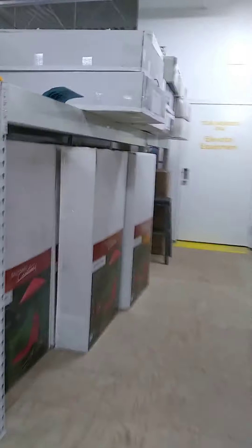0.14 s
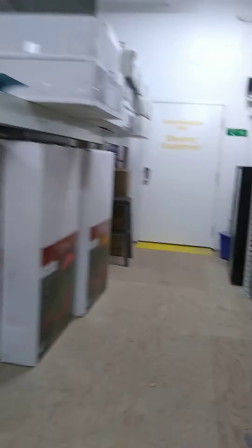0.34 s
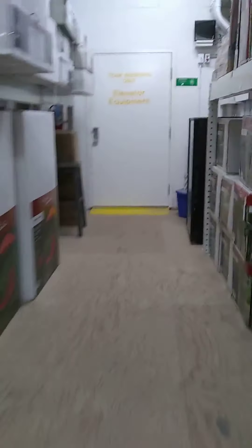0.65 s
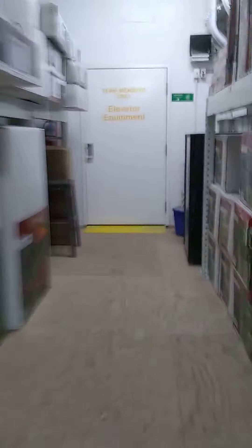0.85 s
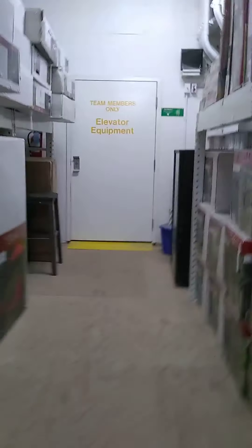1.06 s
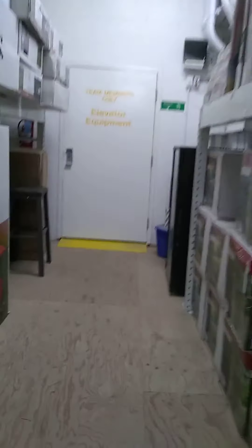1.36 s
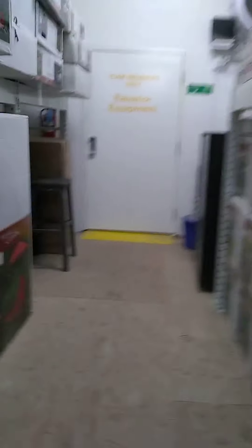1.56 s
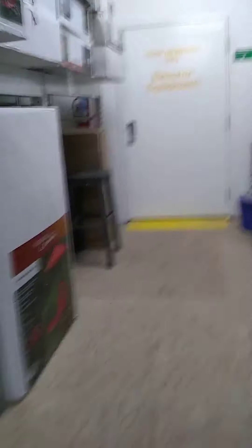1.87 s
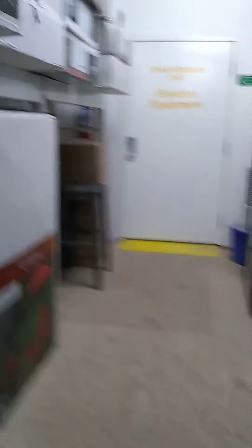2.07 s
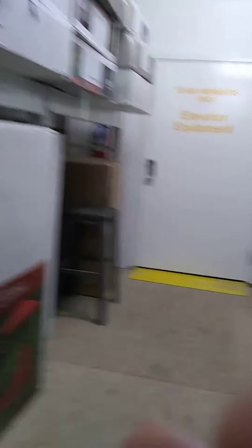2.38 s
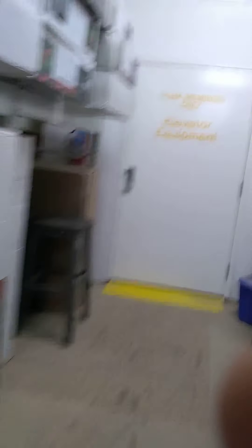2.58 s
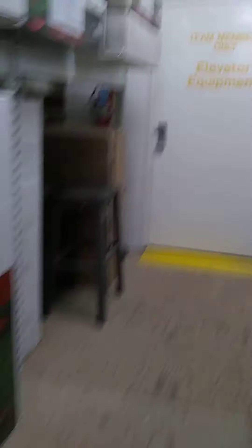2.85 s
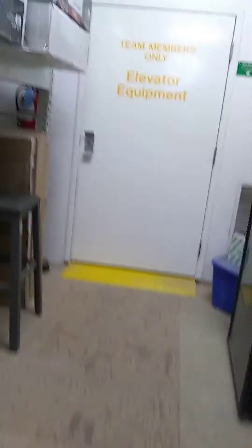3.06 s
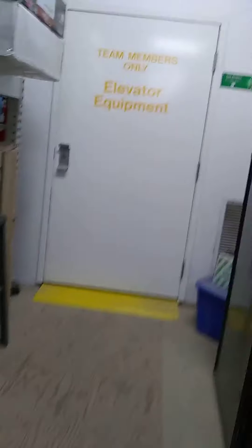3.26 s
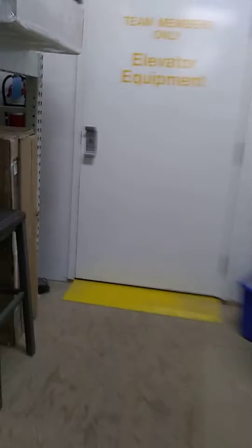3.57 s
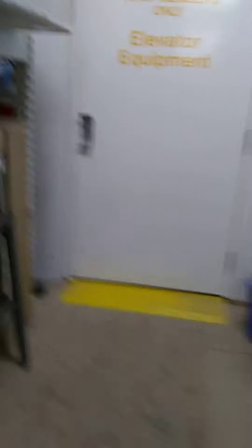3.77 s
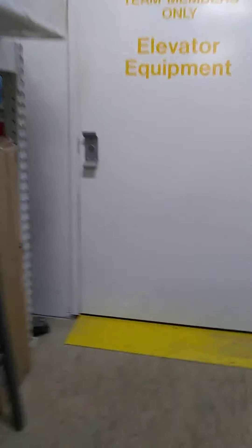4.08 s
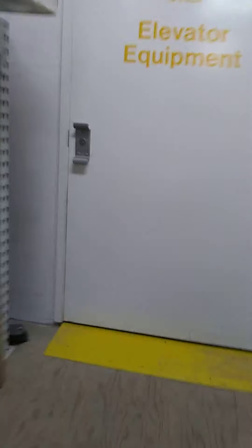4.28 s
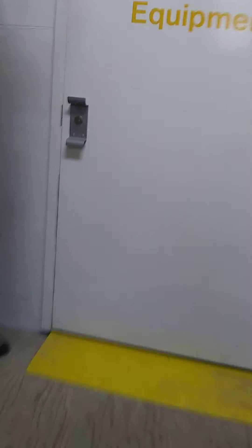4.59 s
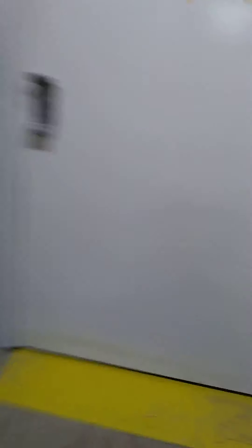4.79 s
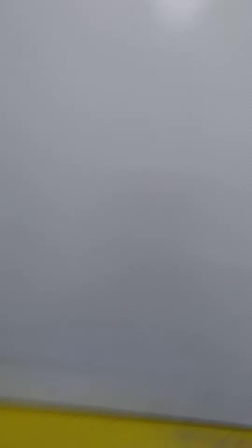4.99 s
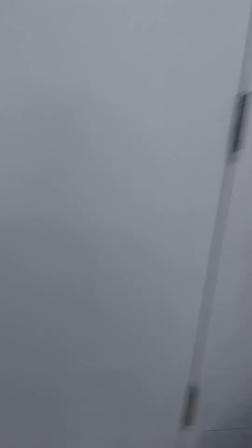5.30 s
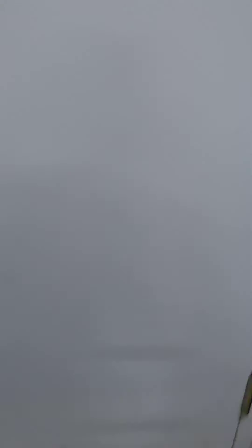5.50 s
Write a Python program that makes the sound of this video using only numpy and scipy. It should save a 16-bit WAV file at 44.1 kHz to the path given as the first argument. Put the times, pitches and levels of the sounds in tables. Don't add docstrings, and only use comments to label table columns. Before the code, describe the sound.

A wheeled cart grinds roughly over a gritty hard floor in a narrow stockroom, rattling with repeated hard clacks, boomy thuds and small metallic ticks.

```python
import sys
import numpy as np
from scipy import signal
from scipy.fft import rfft, irfft, next_fast_len
from scipy.io import wavfile

SR = 44100
rng = np.random.default_rng(int(sys.argv[2]) if len(sys.argv) > 2 else 0)


def dump(signal):
    limited = np.clip(np.atleast_2d(signal).T, -1, 1)
    pcm = np.round(limited * 32767).astype(np.int16)
    wavfile.write(sys.argv[1], SR, pcm)


def elevation(decibels):
    levels = np.asarray(decibels, float)
    return 10 ** (levels / 20)


N = 248591
SIZE = next_fast_len(N + SR // 2)
HZ = np.maximum(np.arange(SIZE // 2 + 1) * SR / SIZE, 1)
PATHS = 4


def rms_one(x):
    return x / np.sqrt(np.mean(np.abs(x) ** 2) + 1e-20)


def at_hz(points):
    hz, *columns = np.transpose(points)
    return [np.interp(np.log(HZ), np.log(hz), c) for c in columns]


def in_time(rows):
    s, *columns = np.transpose(rows)
    return [np.interp(np.arange(N) / SR, s, c) for c in columns]


def drift(rate_hz):
    knots = rng.standard_normal(N // 40 + 2002)
    pole = np.exp(-80 * np.pi * rate_hz / SR)
    slow = signal.lfilter([1], [1, -2 * pole, pole * pole], knots)[2000:]
    return np.interp(np.arange(N) / 40, np.arange(len(slow)), rms_one(slow))


def rings(modes):
    response = 0
    for k, (hz, width_hz, db) in enumerate(modes):
        detuning = (HZ ** 2 - hz ** 2) / (HZ * max(width_hz, 2))
        response = response + (-1) ** k * elevation(db) / (1 + .64j * detuning) ** 2
    return response


def bursts(times, levels_db, t60, rise_s):
    out, t = np.zeros(N + SR), np.arange(round(SR * t60)) / SR
    first = 1 + 0.41 * np.exp(-t / 0.0012)
    for s, db in zip(times, levels_db):
        i = round(s * SR)
        out[i:i + len(t)] += elevation(db - 60 * t / t60) * first * (1 - np.exp(-t / rise_s))
    return out[:N]


PATH_TURNS = [0, .25, .25, .75]


def struck(times, levels_db, pitches_hz, t60, rise_s):
    out, t = np.zeros((PATHS, N + SR)), np.arange(round(SR * t60)) / SR
    for s, db, hz, turn in zip(times, levels_db, pitches_hz, rng.random((len(times), PATHS))):
        i = round(s * SR)
        swell = elevation(db - 60 * t / t60) * (1 - np.exp(-t / rise_s))
        phase = (turn[0] + turn / 10 + PATH_TURNS)[:, None]
        out[:, i:i + len(t)] += swell * np.sin(2 * np.pi * (hz * t + phase))
    return out[:, :N]


def grit(per_s, spread_db, smooth):
    happens = rng.random(N) < per_s / SR
    sizes = elevation(spread_db * np.minimum(rng.exponential(1, N), 3)) * happens
    return rms_one(rng.standard_normal((PATHS, N)) * (rms_one(sizes) + smooth))


def shaken(steady_db, jolts, contacts, broad, modes, flutter_db, patchy_db):
    force = np.hypot(elevation(steady_db + flutter_db * drift(2.8)), jolts) * contacts
    groups = [rings(modes[k::3]) for k in range(3)]
    size = np.sqrt(np.mean(np.abs(broad + sum(groups)) ** 2))
    total = sum(rfft(force * elevation(patchy_db * drift(8.5)), SIZE) * group for group in groups)
    if np.ndim(broad):
        total = total + rfft(force, SIZE) * broad
    return total / size


# worst_s [s], length_s [s], level_db [dB], brightness_db [dB]
PATCHES = [(0.076, 0.22, -37.5, 1), (0.362, 0.23, -36.5, 1.5), (0.608, 0.29, -36.5, -4),
           (0.728, 0.23, -33, -2), (1.052, 0.22, -36.5, -6), (1.201, 0.059, -30, 8),
           (1.561, 0.15, -31.5, 3.5), (1.83, 0.27, -39.5, -0.5), (2.192, 0.11, -31.5, -1),
           (2.28, 0.42, -36.5, -4), (2.55, 0.058, -42, -9), (2.806, 0.12, -31.5, 7.5),
           (2.906, 0.051, -36.5, -9), (3.118, 0.27, -36.5, 1), (3.337, 0.22, -38, -3),
           (3.419, 0.11, -26, 4), (3.498, 0.38, -36, -0.5), (3.747, 0.2, -40, 2), (4.007, 0.075, -32, -3),
           (4.066, 0.035, -32, 0.5), (4.147, 0.25, -34, 2), (4.328, 0.11, -36.5, 0.5),
           (4.582, 0.081, -33, 1.5), (4.628, 0.028, -24, -16), (4.8, 0.13, -41, 7),
           (4.845, 0.12, -32.5, -6), (5.018, 0.2, -43.5, -47), (5.094, 0.21, -35, 3),
           (5.314, 0.13, -49, -18), (5.36, 0.1, -46.5, 9), (5.436, 0.061, -33.5, -11)]


def patches(brightness_share):
    rise, fall, slope_db = 0.36, 0.52, 12
    t, power = np.arange(0, N + 64, 64) / SR, 1e-12
    for s, length_s, db, bright_db in PATCHES:
        away = np.maximum((s - t) / rise, (t - s) / fall) / max(length_s, .01)
        power = power + elevation(db + brightness_share * bright_db - slope_db * away) ** 2
    return np.interp(np.arange(N) / SR, t, 10 * np.log10(power))


def shake_db(steady_db, over_db, swing, patch_db, bright):
    mean_db = steady_db.mean()
    steady = mean_db + over_db + swing * (steady_db - mean_db)
    return 20 * np.log10(np.hypot(elevation(steady), elevation(patches(bright) + patch_db)))


# start_s [s], wheel_grind_db [dB], deck_bounce_db [dB]
ROLLING = [(0.0, -42, -36.5), (0.5, -46, -66), (0.53, -43, -43.5), (1.25, -37, -38.5), (1.47, -40.5, -45.5),
           (1.55, -39, -39.5), (2.26, -48.5, -37.5), (2.52, -44, -51), (2.92, -36, -37), (3.01, -40, -47),
           (3.07, -40, -37), (3.39, -51.5, -48), (3.42, -44, -52), (3.67, -57, -59), (3.73, -42.5, -43),
           (4.83, -43, -43), (5.44, -41.5, -44), (5.63, -41.5, -47)]


def cart():
    grind_db, bounce_db = in_time(ROLLING)
    road = grit(per_s=1800, spread_db=2.5, smooth=0.93)
    plates = deck(bounce_db) + tray(grind_db, road) + body(grind_db, road)
    return plates + clacks() + rails(grind_db, road) + frame(grind_db) + loose_parts(grind_db)


# start_s [s], body_peak_db [dB], pitch_hz [Hz], rails_over_body_db [dB]
KNOCKS = [(0.333, -35, 955, -5), (0.592, -15, 937, -11.5), (0.715, -15, 970, -14.5),
          (1.014, -20.5, 870, -11), (1.198, -21.5, 1500, -8), (1.552, -35.5, 735, 3.5),
          (1.754, -26.5, 1030, -5), (1.918, -18.5, 1083, -30), (2.187, -38, 646, -1),
          (2.267, -19.5, 935, -14), (2.548, -23.5, 1134, -17), (2.694, -22.5, 948, -13.5),
          (2.784, -17.5, 1200, -12), (3.299, -23.5, 730, -12), (1.175, -18.5, 905, -16),
          (3.424, -16.5, 884, -14), (3.497, -21.5, 710, -11), (3.608, -21, 986, -15),
          (3.999, -36, 1160, -24), (4.054, -22, 670, -25), (4.134, -15.5, 1075, -17),
          (4.232, -20, 970, -21), (4.296, -19, 1056, -25), (4.558, -19.5, 810, -18),
          (4.618, -10, 1014, -15), (4.634, -23.5, 1070, -1.5), (4.647, -14, 645, -32),
          (4.988, -23, 696, -11.5), (5.101, -34.5, 716, 9), (5.43, -18.5, 1075, -24)]
# start_s [s], body_peak_db [dB], pitch_hz [Hz], rails_over_body_db [dB]
BOUNCES = [(0.069, -28, 1004, -9), (0.552, -22.5, 950, -20), (0.851, -31, 1010, -12),
           (0.921, -43, 900, -24), (1.023, -28, 855, -18), (1.067, -24.5, 860, -11), (1.128, -25, 950, -21),
           (1.206, -20.5, 695, -15), (1.535, -29, 780, -19), (1.827, -26.5, 1010, -5.5),
           (2.277, -27, 700, -12), (2.804, -19, 1480, -12), (2.82, -16.5, 746, -25), (2.845, -19, 835, -27),
           (2.9, -23.5, 990, -10), (3.112, -24, 715, -15), (3.221, -26.5, 1250, -26),
           (3.311, -22, 1370, -19), (3.335, -22, 1335, -22), (3.434, -15.5, 886, -15),
           (3.451, -16, 684, -16), (3.479, -17.5, 935, -20), (3.789, -22.5, 895, -22),
           (3.807, -29, 1030, -33), (4.067, -18, 1220, -20), (4.147, -19, 1120, -14),
           (4.178, -21, 1074, -24), (4.316, -23, 950, -19), (4.571, -16, 936, -24), (4.813, -50, 780, -16),
           (4.85, -29, 1010, -4), (5.381, -34, 1010, -25)]


def wheel_impacts():
    start_s, body_db, pitch_hz, over_db = np.transpose(KNOCKS + BOUNCES)
    return start_s, body_db, pitch_hz, body_db + over_db


# start_s [s], level_db [dB], pitch_hz [Hz], tray_db [dB]
THUDS = [(0.283, -39, 140, -33), (0.516, -26, 131, -51), (0.594, -29, 147.5, -49),
         (0.684, -20.5, 133.6, -40), (0.894, -23.5, 133, -36), (0.993, -24, 135, -33),
         (1.208, -20, 125.4, -52), (1.57, -18.5, 133.6, -46), (1.696, -49, 143, -55),
         (1.751, -22.5, 140, -45), (1.815, -20, 138, -46), (1.864, -50, 138, -55), (1.921, -25, 162, -38),
         (2.037, -21.5, 150, -55), (2.086, -62, 140, -67), (2.185, -19, 140, -47), (2.282, -37, 135, -41),
         (2.666, -33, 148, -54), (0.744, -25, 138, -45), (3.07, -26, 140, -54), (3.159, -23.5, 140, -33),
         (3.47, -26, 108, -50), (3.748, -29, 130, -51), (3.273, -20.5, 134.5, -42), (3.399, -23, 136, -50),
         (3.42, -18, 123, -50), (3.96, -25, 118, -35), (4.197, -25, 130, -34.5), (4.42, -24.5, 119, -35.5),
         (4.643, -21, 124.6, -27.5), (4.804, -35, 143, -49), (4.844, -24.5, 152, -29.5),
         (5.126, -47, 138, -31.5), (5.532, -37, 150.6, -30.5)]
# start_s [s], level_db [dB], pitch_hz [Hz]
TRAY_HITS = [
    (4.642, -14, 310),
    (5.441, -26, 330),
    (5.452, -25, 296),
    (1.012, -28, 450),
    (1.3, -31, 297),
    (3.519, -26.5, 305),
    (3.621, -30, 306),
    (4.40, -30, 380),
    (5.37, -30, 400),
]
# start_s [s], level_db [dB], pitch_hz [Hz]
CLANGS = [(0.301, -38, 3250), (0.591, -31, 3174), (0.711, -41, 2940), (1.198, -46, 3230),
          (2.784, -54, 2920), (2.805, -52, 3100), (2.846, -53, 3500), (2.895, -55, 2970),
          (4.148, -38, 2880), (4.296, -41.5, 3120), (4.317, -49, 3200), (3.498, -37, 3530),
          (4.055, -38, 2940), (4.134, -34, 2850), (4.232, -39, 3240), (4.568, -38, 3570),
          (4.645, -35, 3290), (0.6, -40, 3160), (4.619, -22, 3000), (4.635, -39, 3400),
          (5.101, -31.5, 3340), (5.431, -46, 2920)]
# pitch_ratio [multiple of its loudest ring], level_db [dB]
BODY_CLUSTER = [(0.64, -16.5), (1.0, -1.5), (1.47, -14.5)]


def clacks():
    at, body_db, body_hz, rails_db = wheel_impacts()
    knocked = sum(struck(at, body_db - 10 + db, ratio * body_hz, t60=0.059, rise_s=0.00029)
                  for ratio, db in BODY_CLUSTER)
    seams = slice(len(KNOCKS))
    rail_hz = np.full(len(KNOCKS), 1972)
    rail_tone = struck(at[seams], rails_db[seams] - 10, rail_hz, t60=0.3, rise_s=0.0033)
    drop, deck_db, deck_hz, _ = np.transpose(THUDS)
    boom = struck(drop, deck_db + 4, deck_hz, t60=0.11, rise_s=0.013)
    clang, frame_db, frame_hz = np.transpose(CLANGS)
    clanging = struck(clang, frame_db + 1.7, frame_hz, t60=0.04, rise_s=0.0016)
    tray_ring = struck(*np.transpose(TRAY_HITS), t60=0.094, rise_s=0.00055)
    return rfft(knocked + rail_tone + boom + clanging + tray_ring, SIZE)


# pitch_hz [Hz], width_hz [Hz], level_db [dB]
DECK_RINGS = [(122, 73, -33), (133.6, 28, 2), (160, 63, 2)]


def deck(bounce_db):
    bumps = grit(per_s=370, spread_db=-1.0, smooth=0.38)
    level_db = shake_db(bounce_db, over_db=-2.5, swing=1, patch_db=-7, bright=0)
    return shaken(level_db, 0, bumps, 0, DECK_RINGS, flutter_db=2.0, patchy_db=1.8)


# pitch_hz [Hz], width_hz [Hz], level_db [dB]
TRAY_RINGS = [(207.7, 30, -13), (253, 63, -4), (287, 16, -10), (361.8, 68.6, -1), (400.5, 33, -4.5)]


def tray(grind_db, road):
    drop, _, _, tray_db = np.transpose(THUDS)
    jolts = bursts(drop, tray_db + .1, t60=0.18, rise_s=0.0015)
    level_db = shake_db(grind_db, over_db=-0.5, swing=0.5, patch_db=-2, bright=-0.26)
    return shaken(level_db, jolts, road, 0, TRAY_RINGS, flutter_db=0.84, patchy_db=2.5)


# pitch_hz [Hz], level_db [dB per Hz]
BODY_BROAD = [(250, -21), (400, 1), (520, 4), (700, 3), (1000, -6.5), (1250, -12), (1600, -15), (3000, -80)]
# pitch_hz [Hz], width_hz [Hz], level_db [dB]
BODY_RINGS = [(583, 22, 1), (688, 19, -26), (817, 61, -7), (970.4, 50, 1.5), (1100.5, 55, 1), (1180, 50, 0)]


def body(grind_db, road):
    at, body_db, _, _ = wheel_impacts()
    jolts = bursts(at, body_db - 7.5, t60=0.022, rise_s=0.0014)
    level_db = shake_db(grind_db, over_db=-4, swing=1.1, patch_db=-3.5, bright=-0.2)
    return shaken(level_db, jolts, road, elevation(at_hz(BODY_BROAD)[0]), BODY_RINGS, flutter_db=0.5, patchy_db=2.5)


# pitch_hz [Hz], level_db [dB per Hz]
RAILS_BROAD = [(600, -51), (1100, 3), (1300, 5), (1950, 13), (2150, -25), (2300, -35), (3000, -6),
               (5000, -67)]
# pitch_hz [Hz], width_hz [Hz], level_db [dB]
RAIL_RINGS = [(1500, 71, -2), (1523, 11, 4.5), (1604, 35, -4), (1794, 12, 16), (1819, 32, 15),
              (2010, 12, -22), (2089, 76, 10.5)]


def rails(grind_db, road):
    at, _, _, rails_db = wheel_impacts()
    jolts = bursts(at, rails_db + 3, t60=0.053, rise_s=0.0054)
    level_db = shake_db(grind_db, over_db=-16.5, swing=1.16, patch_db=-11.5, bright=0)
    return shaken(level_db, jolts, road, elevation(at_hz(RAILS_BROAD)[0]), RAIL_RINGS, flutter_db=0.4, patchy_db=4.5)


# pitch_hz [Hz], level_db [dB per Hz]
FRAME_BROAD = [(1200, -53), (1900, 8), (2400, 4.5), (2900, 8), (3800, 1.5), (4500, 3), (5500, -60),
               (8000, -54)]
# pitch_hz [Hz], width_hz [Hz], level_db [dB]
FRAME_RINGS = [(2810, 30, 1), (3160, 22, -10), (3250, 75, -16), (3394, 37, 4), (3600, 34, -15),
               (3606, 11.4, 4.5), (4970, 60, -7)]


def frame(grind_db):
    at, _, _, rails_db = wheel_impacts()
    jolts = np.hypot(bursts(at, rails_db - 11, t60=0.082, rise_s=0.0006),
                     bursts(*np.transpose(CLANGS)[:2], t60=0.053, rise_s=0.0048))
    contacts = grit(per_s=1500, spread_db=-0.5, smooth=0.99)
    level_db = shake_db(grind_db, over_db=-14.5, swing=0.5, patch_db=-17, bright=0.42)
    return shaken(level_db, jolts, contacts, elevation(at_hz(FRAME_BROAD)[0]), FRAME_RINGS, flutter_db=2.0, patchy_db=7.0)


# pitch_hz [Hz], level_db [dB per Hz]
LOOSE_BROAD = [(1500, -50), (2500, -17), (4000, 8), (5500, 5), (8600, 1), (9200, 2.5), (9700, -6.5),
               (11800, 1), (12600, -21), (13500, -20), (14200, -29)]
# pitch_hz [Hz], width_hz [Hz], level_db [dB]
LOOSE_RINGS = [(6650, 2200, -5), (10300, 4900, -2), (9360, 710, 1), (12200, 800, -18), (5570, 440, -15),
               (7800, 930, -21)]
# start_s [s], level_db [dB]
JANGLES = [(0.301, -52.5), (0.593, -46), (0.74, -51), (1.015, -51), (1.175, -49), (1.36, -48.5),
           (1.552, -51), (1.753, -56), (2.187, -64), (2.267, -52), (2.695, -45), (2.784, -48), (3.388, -47),
           (3.411, -37), (3.424, -55), (3.497, -44.5), (3.549, -49), (3.998, -49.5), (4.08, -49.5),
           (4.136, -60), (4.558, -52), (4.619, -44.5), (5.052, -50), (5.103, -39.5)]


def loose_parts(grind_db):
    at, _, _, rails_db = wheel_impacts()
    jolts = np.hypot(bursts(at, rails_db - 27, t60=0.15, rise_s=0.00089),
                     bursts(*np.transpose(JANGLES), t60=0.21, rise_s=0.00033))
    contacts = grit(per_s=5000, spread_db=0.5, smooth=0.86)
    level_db = shake_db(grind_db + 3.5 * drift(7.6), over_db=-16.5, swing=0.5, patch_db=-19, bright=1.43)
    return shaken(level_db, jolts, contacts, elevation(at_hz(LOOSE_BROAD)[0]), LOOSE_RINGS, flutter_db=1.5, patchy_db=4)


# start_s [s], level_db [dB], pitch_hz [Hz]
SLAPS = [(0.593, -27, 1270), (0.599, -33, 920), (0.6036, -27, 1100), (0.611, -18, 490), (0.622, -27, 480),
         (0.716, -28, 940), (0.719, -23, 600), (0.724, -35, 1120), (0.758, -18, 520), (0.774, -32, 605),
         (1.014, -29, 900), (1.216, -20, 505), (1.754, -27, 1010), (2.547, -42, 1170), (3.609, -29, 980),
         (4.068, -29, 1260), (4.0735, -28, 700), (4.1353, -26, 1080), (4.148, -18, 980), (4.158, -27, 1200),
         (4.178, -23, 1040), (4.192, -31, 593), (4.244, -25, 910), (4.572, -27, 970), (4.624, -16, 900),
         (4.627, -19, 600), (4.633, -22, 700), (4.6365, -27, 1390), (4.656, -23, 990), (4.669, -30, 805),
         (5.103, -30, 1500), (5.111, -35, 1100), (5.121, -29, 800), (5.427, -35, 1220), (5.433, -23, 1140),
         (5.439, -32, 746), (1.036, -35, 700), (1.198, -26, 1500), (2.7995, -27, 1300), (2.806, -24, 1010),
         (2.8185, -19, 750), (2.826, -30, 890), (2.855, -26, 500), (2.916, -37, 600), (3.4355, -10, 610),
         (3.452, -27, 700), (3.463, -22, 1100), (3.499, -25, 1190), (4.649, -21, 500), (5.459, -32, 500)]


def slaps():
    at, db, hz = np.transpose(SLAPS)
    edge_hz = 3200 * rng.uniform(0.882, 1.156, len(at))
    edge = struck(at, db - 14, edge_hz, t60=0.0094, rise_s=0.00048)
    return rfft(struck(at, db, hz, t60=0.015, rise_s=0.00071) + edge, SIZE)


# start_s [s], level_db [dB], pitch_hz [Hz], ring_over_crack_db [dB], t60_s [s]
TICKS = [(0.378, -25, 7800, -7, 0.022), (0.6594, -36, 3100, -8, 0.016), (0.879, -27.5, 8900, -3, 0.038),
         (1.1025, -15.5, 3900, -3, 0.0099), (1.1054, -24.5, 3700, 12.5, 0.0068),
         (1.8256, -31, 3470, 0, 0.035), (4.984, -17, 3160, -3, 0.013), (0.1111, -32, 9550, -9, 0.021),
         (0.7233, -32, 5900, -4, 0.03), (0.8096, -37, 8000, 7, 0.022), (1.3718, -42, 9400, -8, 0.015),
         (1.525, -29, 9500, -3, 0.02), (2.162, -32, 9400, -8, 0.021), (2.5661, -42, 5760, -11, 0.017),
         (2.8828, -29, 9200, -15, 0.024), (3.0565, -53, 5650, -6, 0.018), (3.3892, -35, 9400, -11, 0.02),
         (3.4206, -17, 9400, -5, 0.028), (3.787, -30, 9300, -8, 0.016), (4.2446, -33.5, 5700, 3, 0.014),
         (4.7072, -32.5, 9400, -9, 0.018), (4.789, -41, 9500, -1, 0.02), (5.0515, -32, 5800, 1, 0.0092),
         (5.266, -31, 3650, -3, 0.021), (0.0144, -33, 5200, -4, 0.017), (1.5125, -39, 9800, -6, 0.015),
         (3.8571, -33, 10200, -8, 0.015)]


def pin():
    crack_share = 0.59
    out, t = np.zeros((PATHS, N)), np.arange(round(0.034 * SR)) / SR
    bright = signal.butter(2, [4500, 13000], "band", fs=SR, output="sos")
    for (s, db, hz, ring_db, t60), turn in zip(TICKS, rng.random((len(TICKS), PATHS))):
        i = round(s * SR)
        noise = signal.sosfilt(bright, rng.standard_normal((PATHS, len(t))))
        crack = noise * elevation(60 * t / t60 * (2 - 1 / crack_share))
        ring = elevation(ring_db) * np.sin(2 * np.pi * (hz * t + turn[:, None]))
        swell = elevation(db - 9.0 - 60 * t / t60) * (1 - np.exp(-t / 0.0003))
        out[:, i:i + len(t)] += swell * (crack + ring)
    return rfft(out, SIZE)


# start_s [s], pitch_hz [Hz], level_db [dB]
SQUEAK = [
    (1.435, 790, -48),
    (1.447, 760, -37),
    (1.47, 650, -34.5),
    (1.495, 628, -36),
    (1.515, 610, -52),
]


def castor():
    hz, level_db = in_time(SQUEAK)
    t = np.arange(N) / SR
    sounding = (t > SQUEAK[0][0]) & (t < SQUEAK[-1][0])
    turn = np.cumsum(hz * (1 + 0.0083 * drift(61))) / SR + rng.random((PATHS, 1))
    return rfft(sounding * elevation(level_db) * np.sin(2 * np.pi * turn), SIZE)


# start_s [s], level_db [dB]
HUM = [
    (0, -61),
    (2.5, -51),
    (2.8, -42),
    (3.5, -51),
    (4.0, -41.5),
    (4.7, -41.5),
    (5.1, -69),
    (5.63, -68),
]


def hum():
    mean_hz, waver_hz, right_lead_turns = 119.6, 5.79, 0.14
    turn = np.cumsum(mean_hz + waver_hz * drift(4.14)) / SR + np.array([[0], [right_lead_turns]])
    side_db = np.array([[3], [-8]])
    level_db = in_time(HUM)[0] + 3 * drift(16.0) + side_db
    return np.sqrt(2) * elevation(level_db) * np.sin(2 * np.pi * turn)


# start_s [s], level_db [dB]
TREMBLE = [(0.0, -50), (0.03, -52.5), (1.22, -51), (1.24, -47), (2.04, -52), (2.1, -56), (2.98, -45.5),
           (3.01, -54), (3.45, -52), (3.5, -51), (4.37, -52), (4.5, -41.5), (4.74, -50.5), (5.63, -44.5)]
# pitch_hz [Hz], level_db [dB per Hz]
RUMBLE = [
    (15, -21),
    (30, 8),
    (60, 20.5),
    (90, 6),
    (160, -23),
]
# pitch_hz [Hz], level_db [dB per sample bin]
HISS = [
    (2000, -102),
    (5000, -106),
    (12000, -110),
    (14200, -116),
]


def rumble():
    low, high = rng.standard_normal((2, PATHS, N))
    tremble = rfft(elevation(in_time(TREMBLE)[0]) * low, SIZE) * rms_one(elevation(at_hz(RUMBLE)[0]))
    hiss = elevation(at_hz(HISS)[0] + 46.0) * (HZ > 2000)
    return tremble + rfft(high, SIZE) * hiss


def aisle():
    t60_s, tail_db = 0.52, -10.5
    t = np.arange(SR // 2) / SR
    tail = rng.standard_normal((PATHS, len(t))) * elevation(-60 * t / t60_s) * (t > .004)
    tail = signal.lfilter([.45], [1, -.55], tail)
    return 1 + elevation(tail_db) * rms_one(rfft(tail, SIZE))


# pitch_hz [Hz], second_port_db [dB], unshared_share [0 to 1], left_minus_right_db [dB]
PORTS = [(25, 0.5, 0.24, 24), (60, -0.5, 1, -0.5), (140, -3, 0.47, 11.5), (350, 2, 0.17, 4.5),
         (520, 4.5, 0.18, 4), (1060, -7, 0.052, 2), (2350, -2.5, 0.0039, 1), (3400, -7, 0.088, -0.5),
         (4100, -17, 0.27, -1.5), (5300, -31, 0.42, -0.5), (6400, 2, 0.6, 1), (7800, -10, 0.46, -0.5),
         (8760, -7, 0.89, 2.5), (9800, -22, 0.34, 2), (10900, 3, 0.73, 2), (12300, -10, 0.44, 2),
         (13500, -10, 0.1, 1)]


def ports(paths):
    lag_s = 19.62 / 44100
    second_db, apart, left_db = at_hz(PORTS)
    alike = np.sinc(2 * HZ * lag_s)
    lag, gain = np.exp(-2j * np.pi * HZ * lag_s), elevation(second_db)
    first = paths[0]
    second = gain * (alike * first + np.sqrt(1 - alike ** 2) * paths[1])
    even = np.sqrt(1 + gain ** 2 - 2 * gain * alike * lag.real + 1e-9)
    shared = np.array([first - lag * second, second - lag * first]) / even
    near_null = (HZ > 3400) * ((1 + lag.real) / 2) ** 6
    apart = np.clip(apart, 0, 1) * (1 - 0.8 * near_null)
    sides = np.sqrt(1 - apart) * shared + np.sqrt(apart) * paths[2:]
    return sides * elevation([left_db / 2, -left_db / 2])


def scene():
    paths = (cart() + castor()) * aisle() + slaps() + pin() + rumble()
    return irfft(ports(paths), SIZE)[:, :N] + hum()


def top_cut(x):
    return signal.sosfilt(signal.butter(12, 15210, fs=SR, output="sos"), x)


def record(dry):
    rounded = 0.57 * np.tanh(dry / 0.52)
    low_pass = signal.ellip(9, .5, 46, 14260, fs=SR, output="sos")
    return top_cut(signal.sosfilt(low_pass, rounded))


dry = scene()
out = record(dry)
dump(out)
```